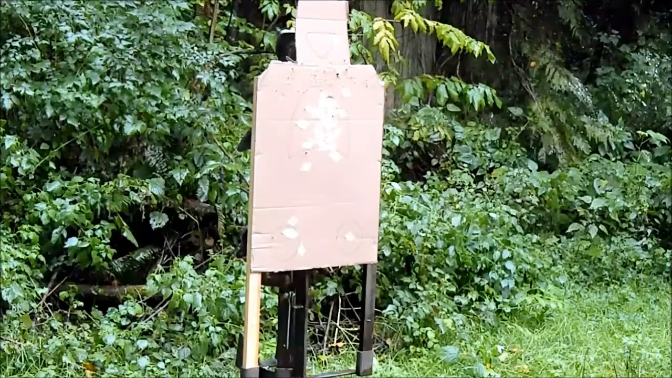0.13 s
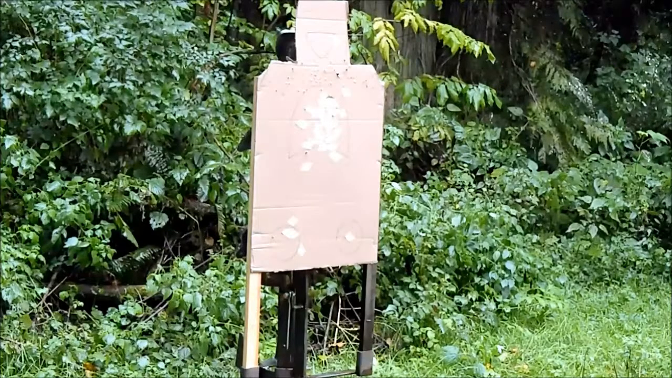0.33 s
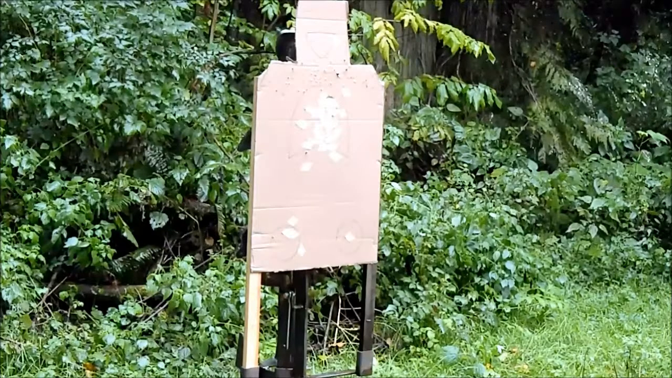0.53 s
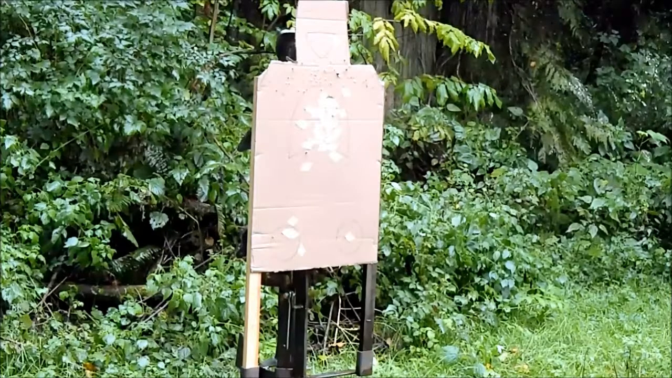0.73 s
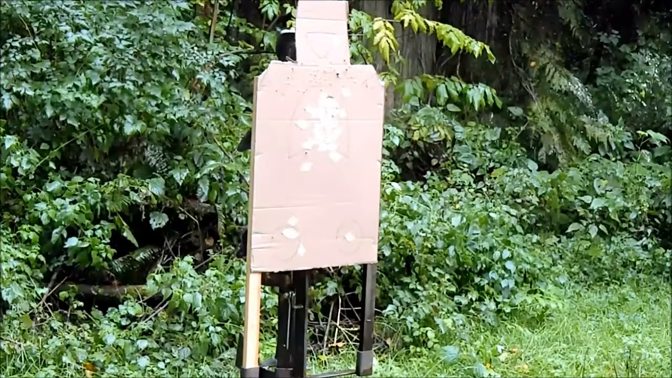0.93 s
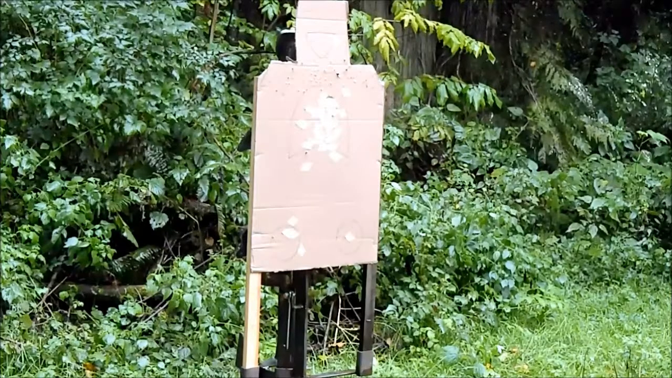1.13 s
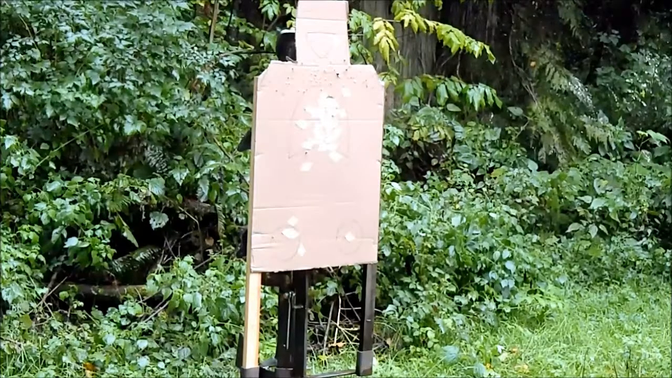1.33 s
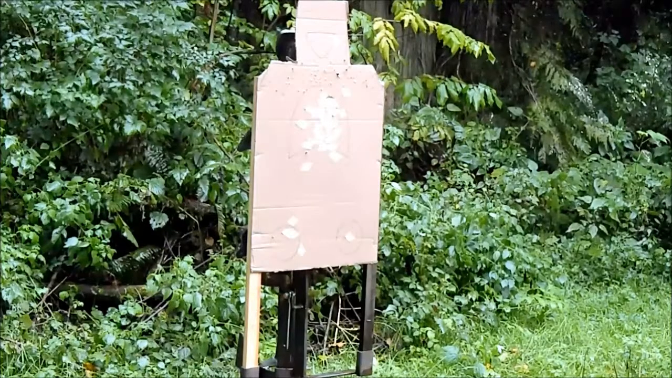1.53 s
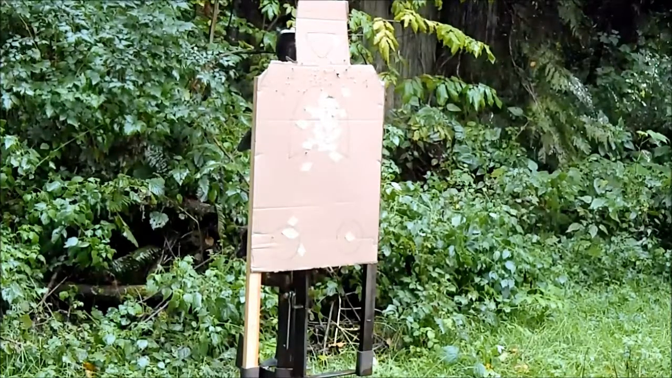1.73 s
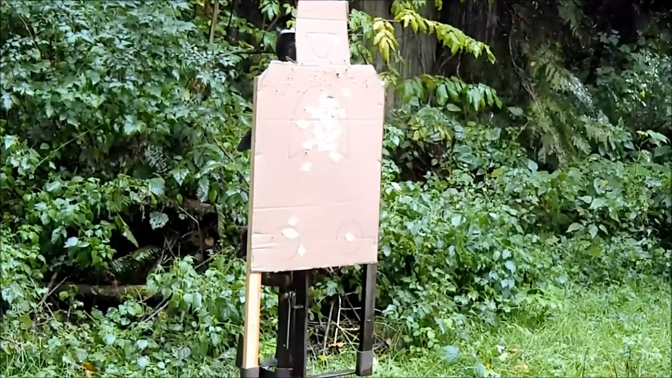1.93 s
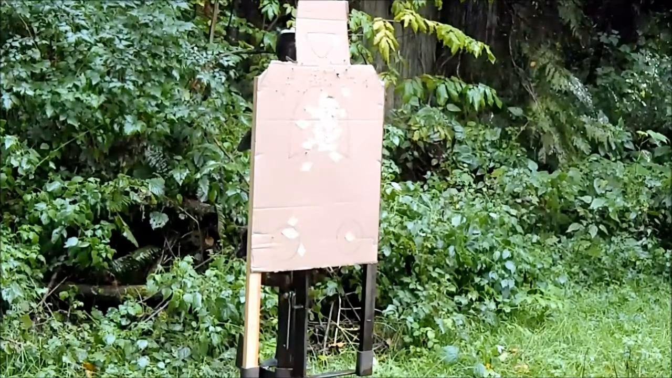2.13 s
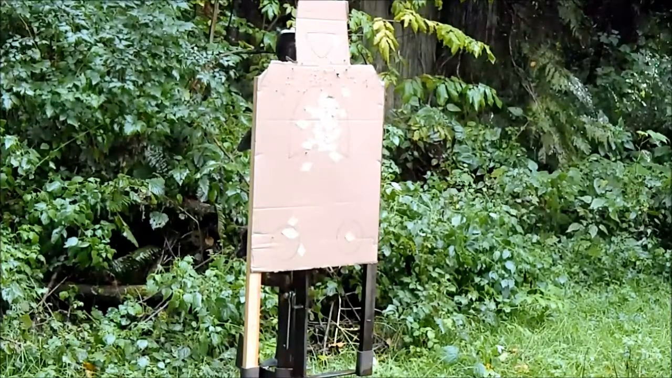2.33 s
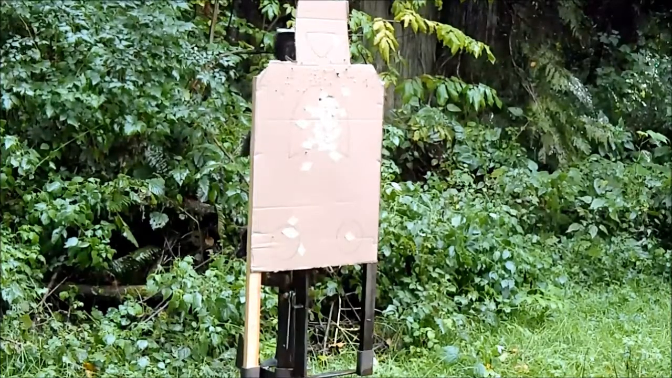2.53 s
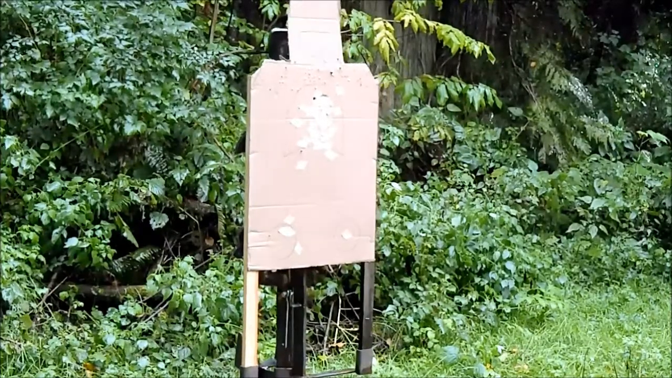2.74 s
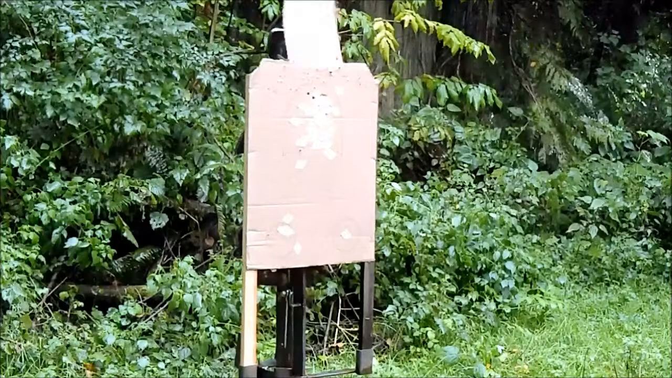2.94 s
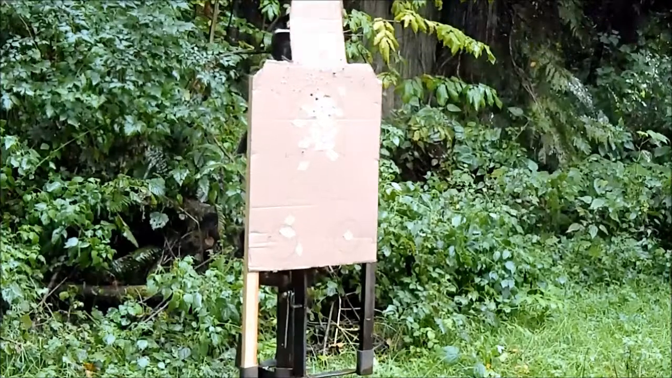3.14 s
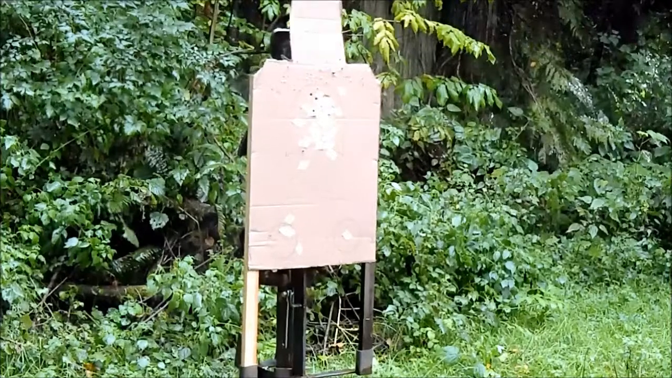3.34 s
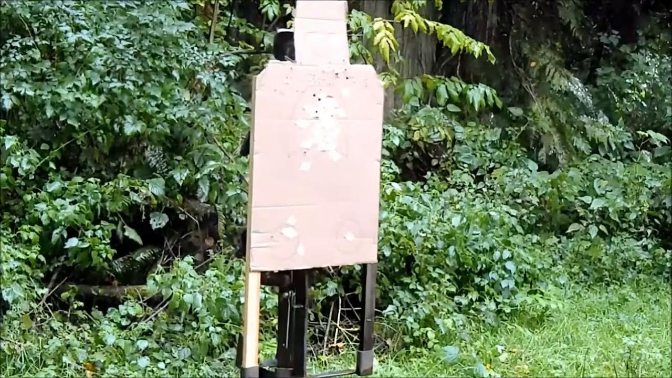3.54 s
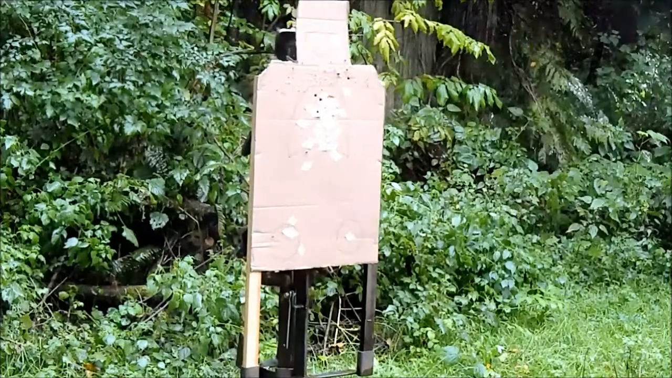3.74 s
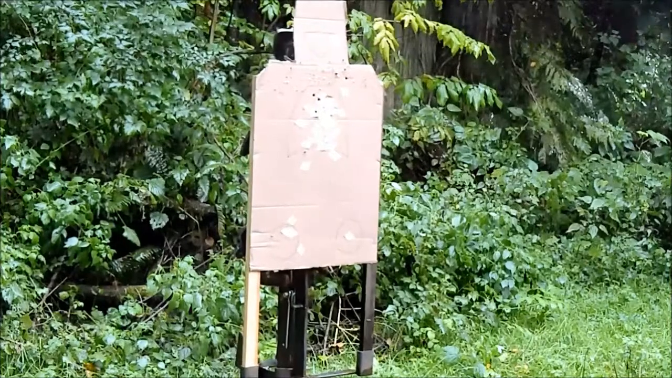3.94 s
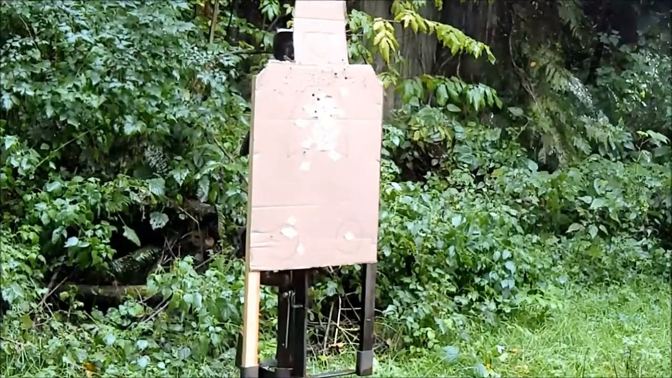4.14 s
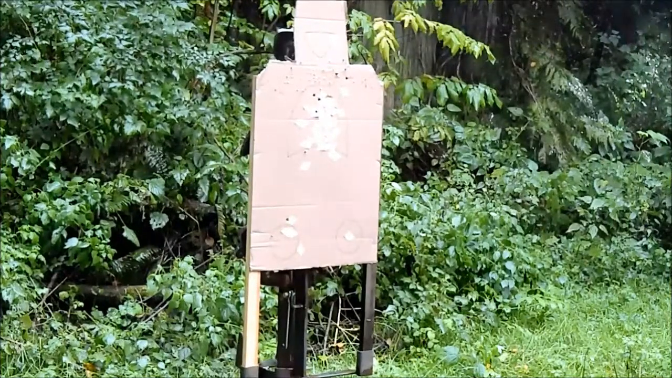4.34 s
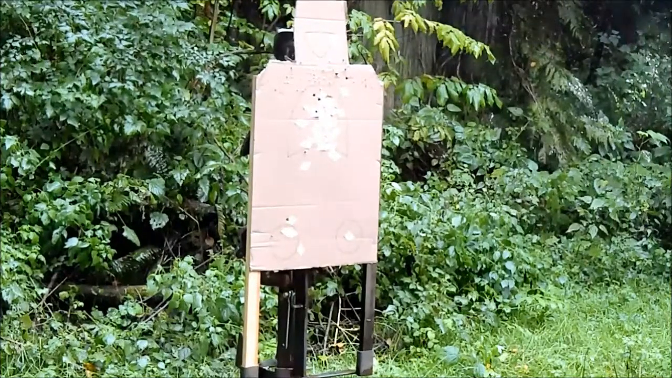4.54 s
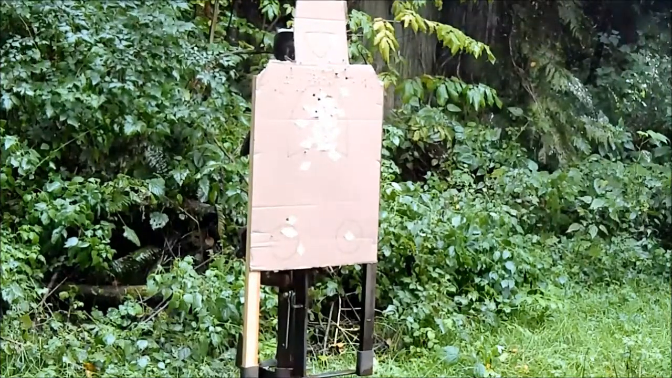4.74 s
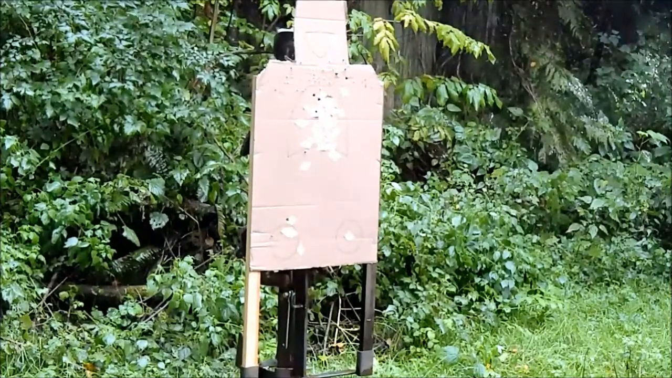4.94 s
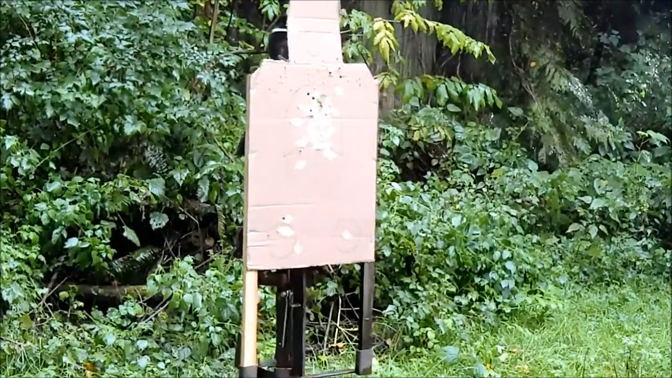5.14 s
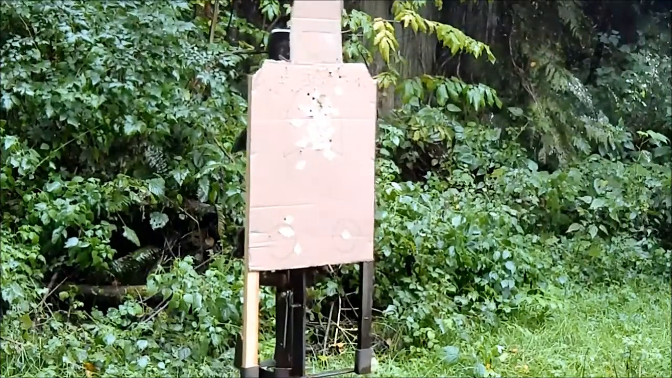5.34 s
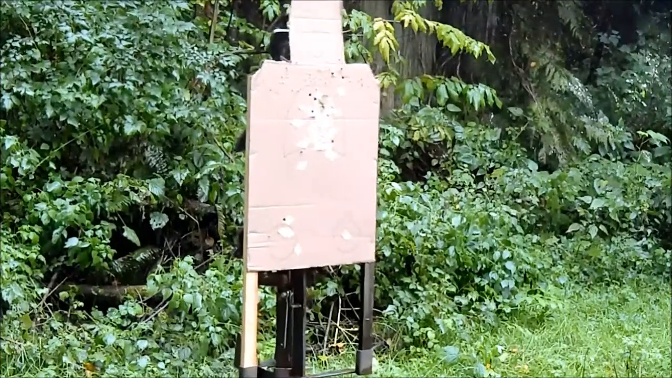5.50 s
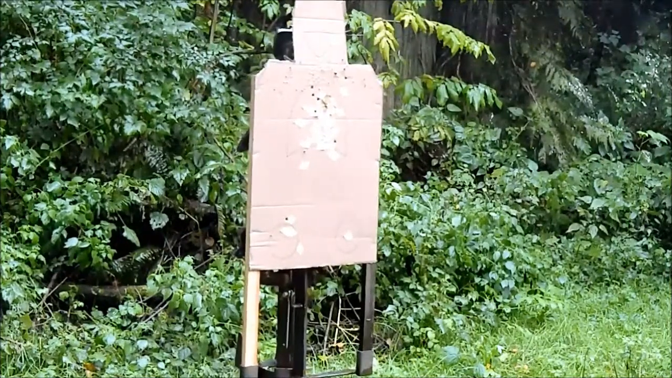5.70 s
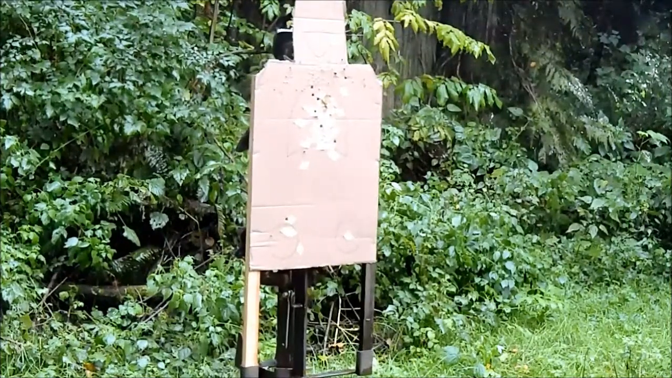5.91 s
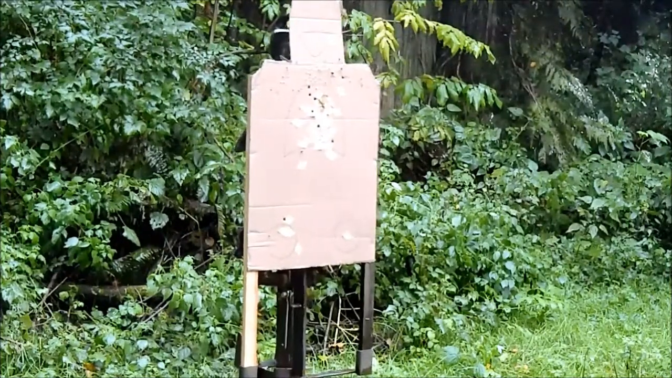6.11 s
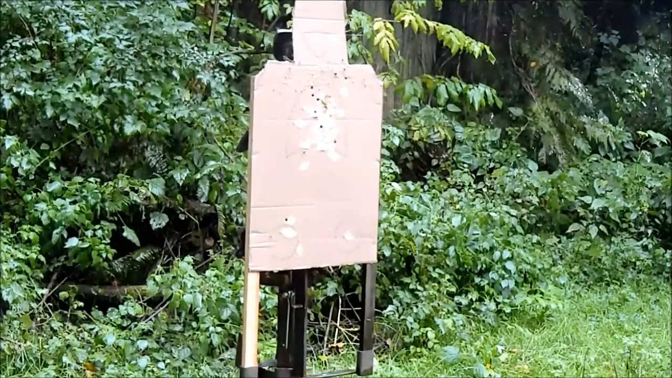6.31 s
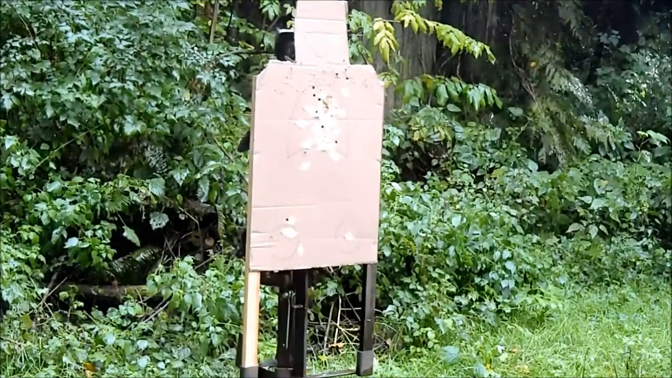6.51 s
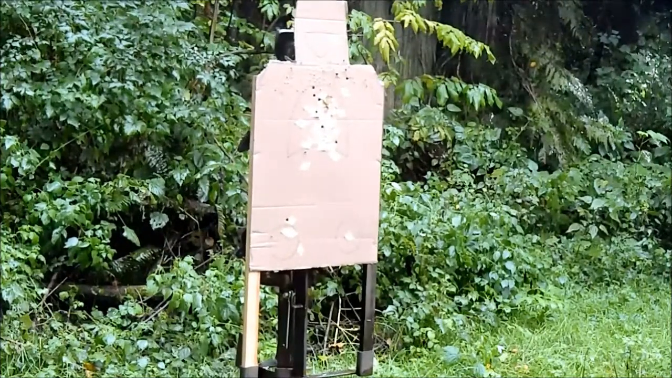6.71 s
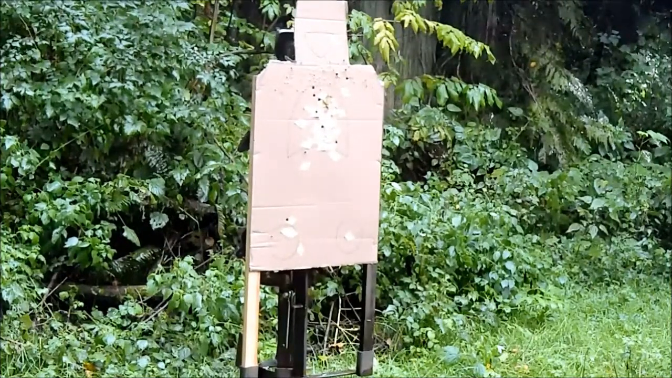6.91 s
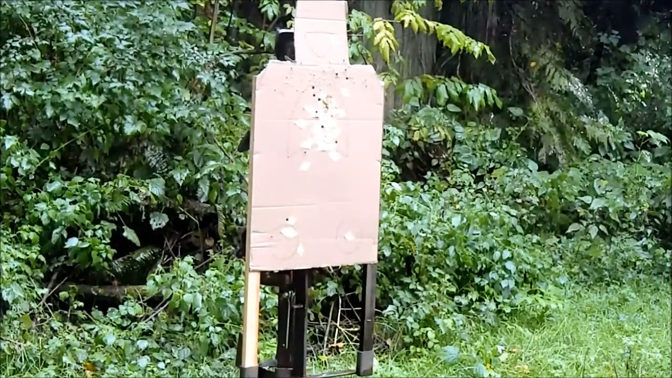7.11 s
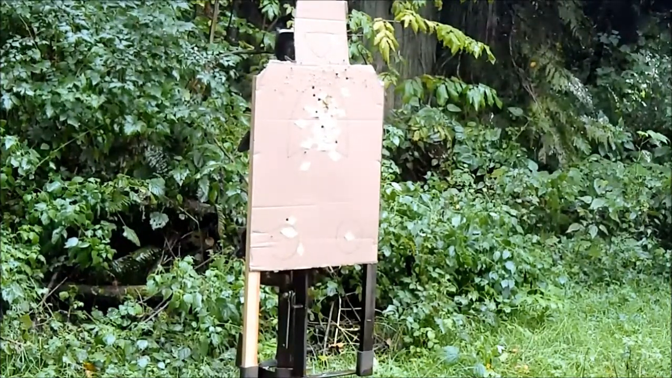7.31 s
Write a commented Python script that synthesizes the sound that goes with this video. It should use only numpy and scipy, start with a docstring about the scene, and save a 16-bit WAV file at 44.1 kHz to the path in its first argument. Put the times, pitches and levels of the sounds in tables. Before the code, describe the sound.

Nine loud close pistol shots in a forest clearing, each followed by a short choked steel clank and rolling woodland echo, then magazine-change clicks.

```python
"""Pistol at a steel plate, forest clearing

Nine shots close to the microphone, with gun handling before and a magazine change after.
Each blast is decaying noise plus a low pressure shock; the plate and loose metal are damped sines.
The same trunks return every blast as single echoes, and fading noise rolls away through the wood.
The microphone peaks near 4 kHz; its gain control ducks, the peaks clip, and the tail is lifted."""
import sys
import numpy as np
from scipy import signal
from scipy.fft import rfft, irfft, next_fast_len
from scipy.io import wavfile
from scipy.ndimage import minimum_filter1d

SR = 44100
rng = np.random.default_rng(int(sys.argv[2]) if len(sys.argv) > 2 else 0)


def digitize_waveform(pressure):
    """Quantize a signal to 16-bit integers and store it at the path in sys.argv[1].

    Rows of a 2-D input are taken as channels; values are limited to [-1, 1].
    """
    field = np.atleast_2d(pressure).T
    bounded = np.clip(field, -1, 1)
    quanta = np.round(bounded * 32767).astype(np.int16)
    wavfile.write(sys.argv[1], SR, quanta)


N = 328986
TIME = np.arange(2 * SR + SR // 2) / SR  # the life of one event (s)
FRAME = 1024  # samples per spectral frame of the decaying noise

# Shots: start_s, low_push_db (relative to BLAST)
SHOTS = [(2.4579, -4.5), (2.7828, 2.5), (3.0764, -10), (3.3781, -1.5), (4.2247, 4.5), (4.8966, -4.5),
         (5.2080, 1.5), (5.5006, 2), (5.8380, 4)]
# Low push of the blast and its rebound: delay_s, relative_db, length_s
BLAST = [(0, 26, 0.0021), (0.0123, 21, .0024)]
# Muzzle gas: pitch_hz, relative_db (per Hz, at the shot), t60_s
MUZZLE = [(25, -15, 0.052), (73.6, -16.5, 0.1), (130.5, -6.5, 0.085), (403, -21, 0.13), (940, -16, 0.12),
          (4040, -21, 0.1), (13300, -29.5, 0.13)]
# Scatter in the undergrowth: pitch_hz, relative_db (per Hz, at the shot), t60_s
BUSHES = [(25, -24, 0.27), (70, -51, 0.19), (140, -33.5, 0.36), (300, -27, 0.45), (551, -23.5, 0.6),
          (980, -22, 0.47), (1850, -34, 0.72), (3700, -31, 0.43), (6800, -36, 0.63), (13000, -41, 0.2)]
# Roll of the far wood: pitch_hz, relative_db (per Hz, at the shot), t60_s
WOOD = [(25, -34.5, 0.76), (80, -69, 1.9), (190, -60.5, 2.04), (287, -52, 3.26), (454, -40.5, 2.67),
        (955, -39.5, 2.4), (1810, -45.7, 1.98), (3700, -41.5, 1.22), (6720, -45, 1.03), (9860, -51, 0.81),
        (12470, -57.5, 0.61)]
# Single echoes from the stand and the nearest trunks: delay_s, relative_db
TRUNKS = [(.0148, 28), (0.0181, 32), (.038, 17.5), (0.0538, 27.3)]
# Steel plate, choked by its hanger: pitch_hz, relative_db, t60_s
PLATE = [(871, -6, .12), (966, -6, .12), (1110, -7, .12), (2520, -10, .2), (2728, -8, .2), (3227, -10, .2),
         (3500, -10, .25), (3882, -13, .25), (4501, -13, .25)]
# Handling clicks: start_s, level_db, hollow_knock_db, brightness_db (6 kHz and up), chatter_gap_s
CLICKS = [(0.9062, -18.7, -5, 4, .001), (1.706, -26, -3, -10, .0015), (6.786, -20.5, -14, -6, 0.0043),
          (7.0962, -12, 1, -2, 0.021), (7.2428, -24, 8, -5, .0325), (7.3104, -35.5, 0, -2, .002),
          (7.4108, -13.8, 5, -11, 0.0047)]
# Colour of striker, clicks and rubbing: pitch_hz, gain_db
SNAP = [(200, -18.5), (900, -8.5), (1600, -8), (2600, -1), (3300, -5.5), (4000, -8), (4800, -4), (6000, 0),
        (10000, -9), (14000, -16.5)]
# Spent case: pitch_hz, relative_db, t60_s
BRASS = [(7135, 3, 0.11), (7160, -9, .45), (11900, -11, .13)]
# Magazine in its well: pitch_hz, relative_db, t60_s
MAGAZINE = [(176, -6.5, 0.071), (2005, -0.5, 0.11), (2840, -13, .07), (3397, -9, .08), (3850, -5, 0.056),
            (4590, -16, 0.08), (6067, -1, 0.11)]
# Low hum after the magazine click: pitch_hz, relative_db, t60_s
HUM = [(81.7, -0.5, 1.5), (92.2, 5, 0.57)]
# Grip rustling and magazine sliding in its well: start_s, length_s, level_db
SLIDES = [(1.255, .025, -51), (2.037, .13, -55), (2.2, .02, -51), (6.743, 0.068, -34.5),
          (7.098, 0.068, -35.5)]
# Quiet forest air: pitch_hz, level_db (per Hz)
AIR = [(25, -88), (100, -83), (300, -87.5), (1000, -86), (2000, -98), (4000, -104), (8000, -106),
       (14000, -110)]
# Microphone resonance: pitch_hz, gain_db
MICROPHONE = [(450, -2.3), (650, -3.8), (950, -1.5), (1550, -2.6), (2200, -0.4), (3100, 6.5), (3600, 11),
              (3930, 17.5), (4250, 10.5), (4600, 14), (5300, 1), (7000, -7), (14000, -2)]
# Top of the recorded band: pitch_hz, gain_db
TREBLE = [(14000, 0), (14400, -23), (16000, -38)]
TOP_HZ = 16000  # nothing passes from here up

SHOT_DB = -0.44  # every cartridge is equally loud
FRESH_SHARE = 0.36  # changing part of the forest's answer, against the constant part
STEMS_PER_S = 4000  # small echoes from the undergrowth
STRIKER_LEAD_S, STRIKER_DB, STRIKER_T60_S = 0.002, -27.5, 0.02  # falls just before the blast
FLIGHT_S, PLATE_DB = 0.042, -1.5  # the plate answers each shot after the same delay
CRACK_DB, RATTLE_T60_S = 16.5, 0.021  # first crack over its rattle, and the rattle's decay
CHATTER_LOSS_DB, CRACK_LOSS_DB = 7, 2  # each further contact is weaker, and blunter
RETURN_DB, RETURN_T60_S = -28.5, 0.75  # the bushes' answer to a click
CASE_S, CASE_DB = 6.606, -31.5
SEAT_S, SEAT_DB = 7.097, -34.5
SEAT_GAP_S, SEAT_JITTER_S, SEAT_LOSS_DB = 0.016, 0.001, 3  # rattling in the well
HUM_S, HUM_DB, HUM_ATTACK_S = 7.115, -42, 0.02


def amp(db):
    """Decibels to gain."""
    return 10 ** (np.asarray(db) / 20)


def along(points, hz, axis=1):
    """One column of a table, read on a log frequency axis."""
    columns = np.transpose(points)
    return np.interp(np.log(hz + 1), np.log(columns[0] + 1), columns[axis])


def add(track, s, sound):
    """Mix a sound into the track from time s on."""
    start = round(s * SR)
    track[start:start + len(sound)] += sound[:N - start]


def coloured(x, points):
    """Causal minimum-phase filter with the given gains, made by folding the cepstrum."""
    m = 2 * next_fast_len(len(x) // 2 + 4096)
    gain = amp(along(points, np.fft.rfftfreq(m, 1 / SR)))
    cepstrum = irfft(np.log(gain), m)
    cepstrum[1:m // 2] *= 2
    cepstrum[m // 2 + 1:] = 0
    response = np.exp(rfft(cepstrum))
    return irfft(rfft(x, m) * response, m)[:len(x)]


def white(size):
    """Noise of 0 dB per Hz."""
    return rng.standard_normal(size) * np.sqrt(SR / 2)


def dying(table, density=SR):
    """Random pulses (density a second); each frequency has its own first level and decay speed."""
    size = len(TIME) + FRAME
    share = min(density / SR, 1)
    pulses = white(size) * (rng.random(size) < share) / np.sqrt(share)
    hz, t, spectrum = signal.stft(pulses, SR, nperseg=FRAME)
    age = np.maximum(t - FRAME / SR, 0)
    start_db = along(table, hz)[:, None]
    t60 = along(table, hz, axis=2)[:, None]
    faded = spectrum * amp(start_db - 60 * age / t60)
    sound = signal.istft(faded, SR, nperseg=FRAME)[1]
    return sound[FRAME:][:len(TIME)]


def ring(modes):
    """Sum of sines, each dying exponentially."""
    t = TIME[:SR // 2]
    return sum(amp(db - 60 * t / t60) * np.sin(2 * np.pi * hz * t) for hz, db, t60 in modes)


def shock(length):
    """A pressure jump followed by its suction."""
    u = TIME[:SR // 4] / length
    return (1 - u) * np.exp(-u)


def striker():
    """The striker's fall: a short burst of noise with an exponential decay."""
    t = TIME[:SR // 50]
    burst = coloured(rng.standard_normal(len(t)), SNAP)
    return amp(STRIKER_DB - 60 * t / STRIKER_T60_S) * burst


def pistol():
    """Striker, blast, bullet on steel and the forest's answer, nearly the same for every shot."""
    out = np.zeros(N)
    # nearby stems return the blast as separate cracks; the far wood blurs it to a roll
    forest = dying(BUSHES, density=STEMS_PER_S) + dying(WOOD)
    # bark and leaves dull the single echoes
    bark = [(100, -7), (600, -0.5), (1500, -3.5), (4000, -20.5), (14000, -16.5)]  # pitch_hz, gain_db
    echo = coloured(shock(0.00025), bark)
    clang = ring(PLATE)
    for s, low_db in SHOTS:
        add(out, s - STRIKER_LEAD_S, striker())
        fresh = dying(BUSHES) + dying(WOOD)
        answer = (forest + FRESH_SHARE * fresh) / np.hypot(1, FRESH_SHARE)
        add(out, s, amp(SHOT_DB) * (dying(MUZZLE) + answer))
        # the rebound has the opposite sign
        for sign, (delay, push_db, length) in zip((1, -1), BLAST):
            add(out, s + delay, sign * amp(push_db + low_db) * shock(length))
        add(out, s + FLIGHT_S, amp(PLATE_DB) * clang)
        for delay, echo_db in TRUNKS:
            add(out, s + delay, amp(SHOT_DB + echo_db) * echo)
    return out


def clicks():
    """A part snaps to its stop and chatters: cracks with short rattles, faintly returned by bushes."""
    out, t = np.zeros(N), TIME[:SR // 3]
    rattle = amp(-60 * t / RATTLE_T60_S)
    bushes = amp(RETURN_DB - 60 * t / RETURN_T60_S)
    for s, db, knock_db, bright_db, gap in CLICKS:
        # the hollow grip knocks low; bare metal is bright
        colour = [(1300, knock_db - 0.5), (2650, knock_db), (3400, -1), (4450, 1.5), (6000, bright_db)]
        for k in range(3):
            contact = rng.standard_normal(len(t)) * (rattle + bushes)
            contact[0] += amp(CRACK_DB - CRACK_LOSS_DB * k)
            sound = coloured(coloured(contact, SNAP), colour)
            add(out, s + k * gap, amp(db - CHATTER_LOSS_DB * k) * sound)
    return out


def magazine_change():
    """A spent case lands and pings; the magazine seats and its damped modes ring at each rattle."""
    out, t = np.zeros(N), TIME[:SR // 2]
    add(out, CASE_S, amp(CASE_DB) * ring(BRASS))
    for k in range(4):
        s = SEAT_S + k * SEAT_GAP_S + rng.uniform(0, SEAT_JITTER_S)
        add(out, s, amp(SEAT_DB - SEAT_LOSS_DB * k) * ring(MAGAZINE))
    # a low hum swells and fades after the click
    swell = 1 - np.exp(-t / HUM_ATTACK_S)
    add(out, HUM_S, amp(HUM_DB) * ring(HUM) * swell)
    return out


def slides(grain_db=5):
    """Rubbing strokes: noise that catches and slips about every millisecond."""
    out, t = np.zeros(N), TIME[:SR // 2]
    for s, length, db in SLIDES:
        stroke = np.sin(np.pi * np.minimum(t / length, 1))
        # one random level for every 50 samples
        catches = amp(grain_db * rng.standard_normal(len(t) // 50).repeat(50))
        rub = stroke * catches * rng.standard_normal(len(t))
        add(out, s, amp(db) * coloured(rub, SNAP))
    return out


def forest_air():
    """Quiet air of the clearing: steady noise, strongest in the lows."""
    return coloured(white(N), AIR)


def scene():
    """Gun and quiet forest air at one microphone."""
    return (pistol() + clicks() + magazine_change() + slides() + forest_air())[None]


def gain_control(x, target_db=-18.5, range_db=18, release_db=60, window=0.0079, hold=0.028):
    """Loud sound cuts the gain within range_db; after a hold (s) it returns at release_db a second."""
    keep = np.exp(-1 / (window * SR))  # power averaged over about window seconds
    power = signal.lfilter([1 - keep], [1, -keep], x ** 2)
    level = 10 * np.log10(power + 1e-12)
    # highest level of the last hold seconds
    reach = int(hold * SR / 2)
    held = -minimum_filter1d(-level, 2 * reach + 1, origin=reach)
    wanted = np.clip(held - target_db, 0, range_db)
    # the cut jumps up at once but falls no faster than the ramp
    ramp = release_db * np.arange(N) / SR
    cut = np.maximum.accumulate(wanted + ramp) - ramp
    return x * amp(-cut)


def record(dry, ceiling_db=-0.5):
    """Microphone resonance, hiss, gain control, hard clipping and the band limit."""
    hiss = amp(-104) * white(N)  # -104 dB per Hz
    x = gain_control(coloured(dry[0], MICROPHONE) + hiss)
    x = np.clip(x, -amp(ceiling_db), amp(ceiling_db))
    hz = np.fft.rfftfreq(N, 1 / SR)
    band = amp(along(TREBLE, hz)) * (hz < TOP_HZ)
    return irfft(rfft(x) * band, N)[None]


dry = scene()
out = record(dry)
digitize_waveform(out)
```